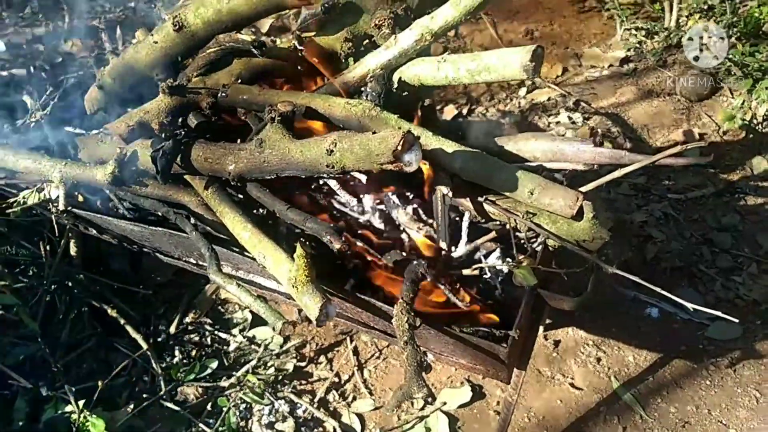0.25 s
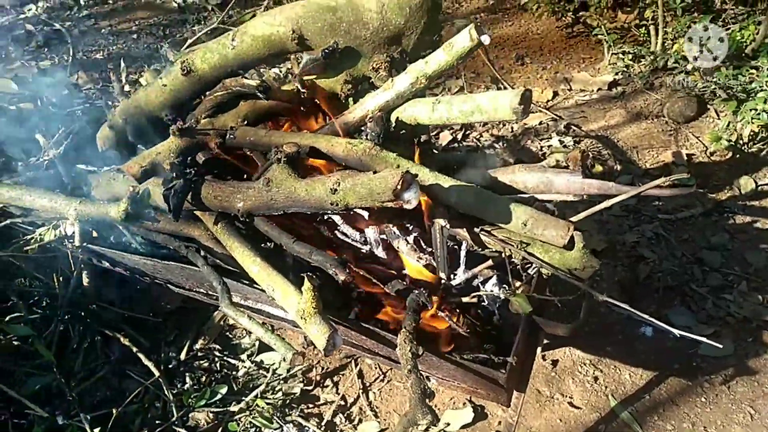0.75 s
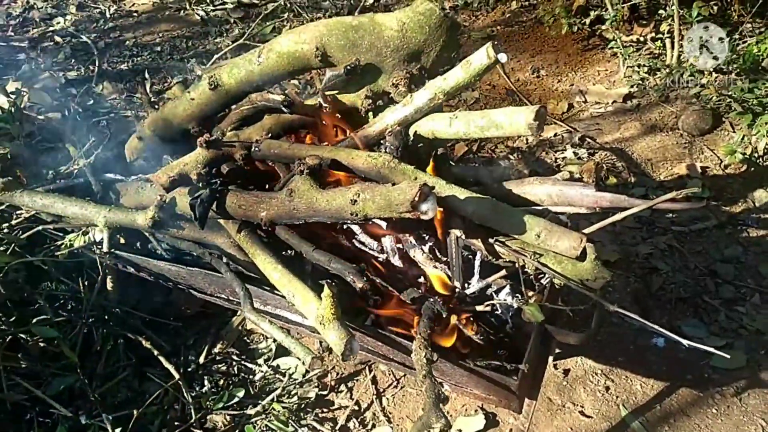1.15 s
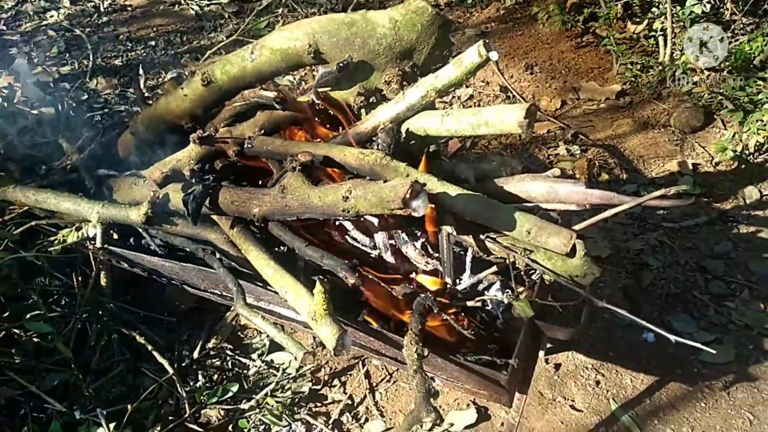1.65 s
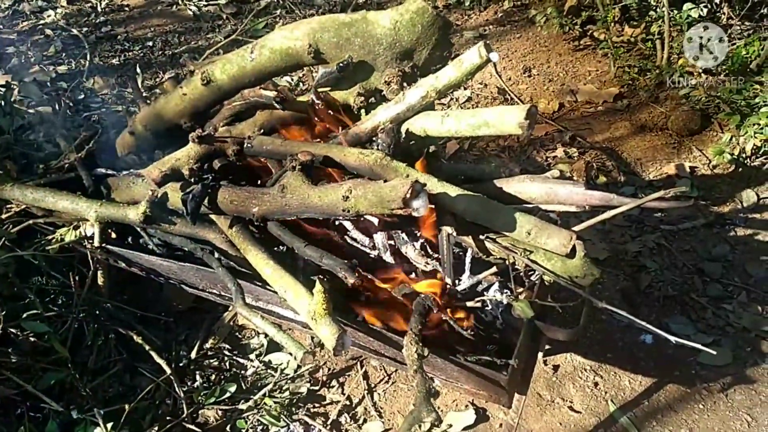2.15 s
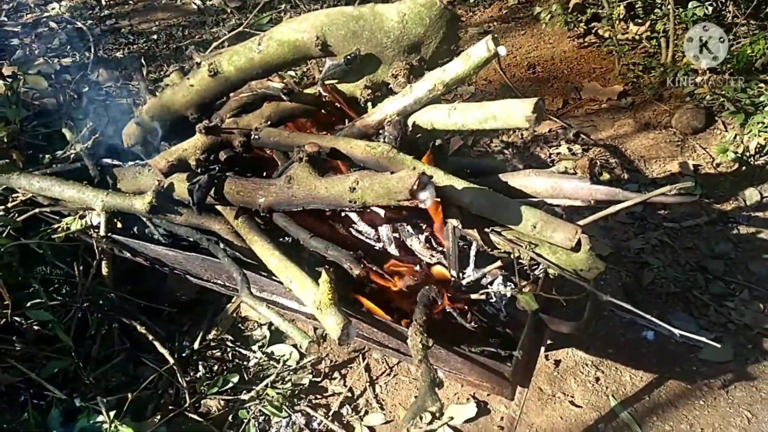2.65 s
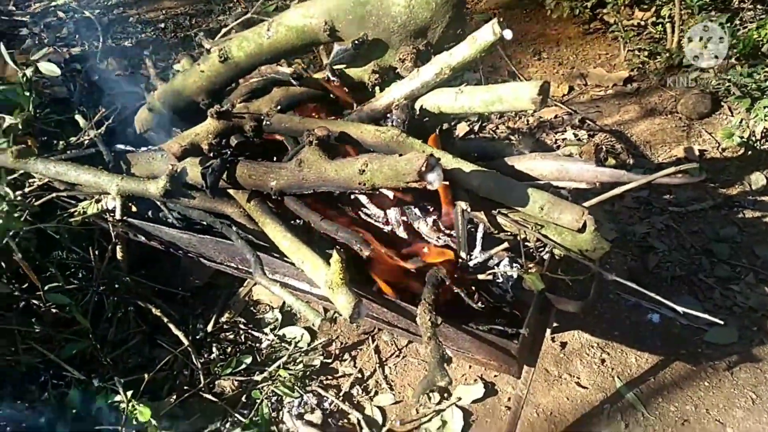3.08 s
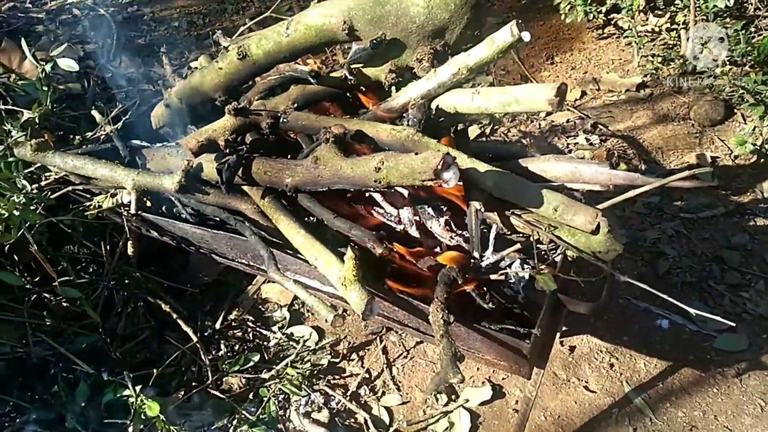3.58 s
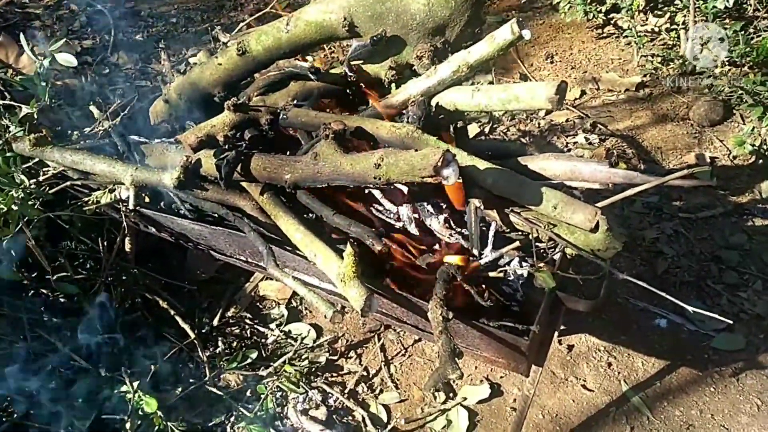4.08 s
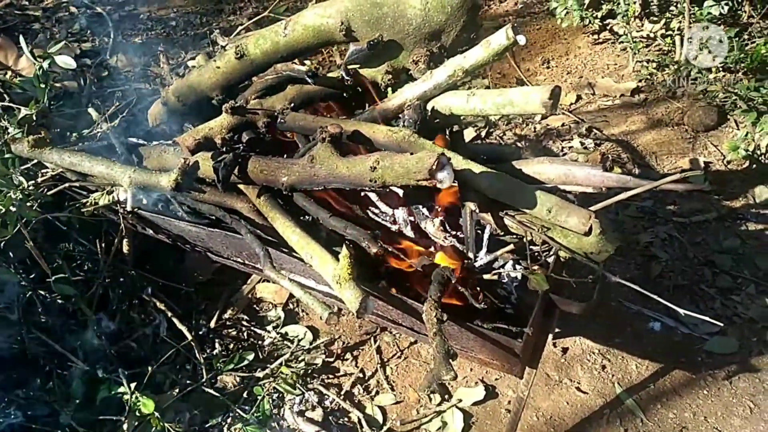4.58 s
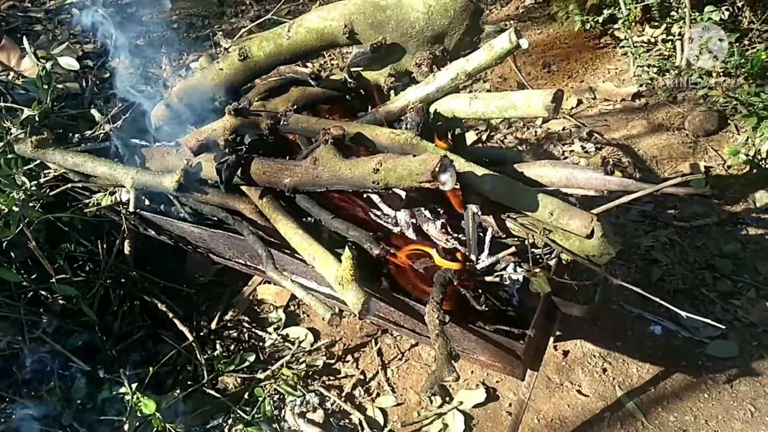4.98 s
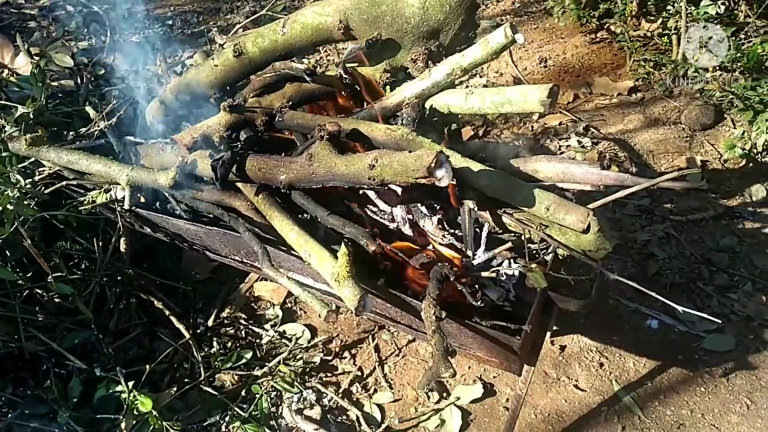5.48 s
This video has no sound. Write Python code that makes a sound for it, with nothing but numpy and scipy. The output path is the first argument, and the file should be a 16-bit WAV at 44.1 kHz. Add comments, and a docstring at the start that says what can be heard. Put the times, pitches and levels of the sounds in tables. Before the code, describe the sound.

Twigs and green branches burn in a metal box outdoors, close to the microphone. Sharp, dry snaps and pops come irregularly, thickest and loudest in the first second, then in looser clusters, each with a very short echo. Around the middle, a light breeze bumps the microphone with soft low rumbles, then eases as the crackling goes on. A faint, high insect buzz and a slight hiss lie underneath.

```python
"""Outdoors among bushes, twigs and green branches burn in a steel box close to a phone.
Pockets of sap snap and pop, and the ground and bushes send back echoes that the phone's noise
suppressor cuts short. Steam sputters out of the wood and once whistles faintly. Insects buzz high in
the shrubs, and gusts of breeze rumble on the microphone over a faint hiss."""
import sys
import numpy as np
from scipy import signal
from scipy.fft import rfft, irfft, next_fast_len
from scipy.io import wavfile
from scipy.ndimage import uniform_filter1d, map_coordinates

SR = 44100
rng = np.random.default_rng(int(sys.argv[2]) if len(sys.argv) > 2 else 0)


def bounce(signal):
    """Save signal as a 16-bit WAV file at the path given by the first command-line argument."""
    frames = np.transpose(np.atleast_2d(signal))
    limited = np.clip(frames, -1, 1)
    pcm = np.round(limited * 32767).astype(np.int16)
    wavfile.write(sys.argv[1], SR, pcm)


N = 252693

# The tone that box, ground and microphone give every pop: (frequency [Hz], gain [dB])
BOX_TONE = [(250, -14), (480, 4), (750, -5), (1100, 5.5), (1700, 1.5), (2300, -6), (2620, -16),
            (3000, -2.5), (3600, 4), (5000, -9.5), (6200, -2), (8400, -9.5), (10500, -0.5), (15300, -3),
            (15700, -23.5), (16400, -26)]
# Bursting sap pockets:
# (time [s], energy [dB], woody knock [dB], snap [dB], brightness [dB], echo relative to pop [dB])
SAP_POPS = [(0.0435, -37, -28, -39, -16, -1), (0.1535, -2.5, -25, -23.5, -4.5, -13),
            (0.192, -22.5, -9.5, -11, -5, 1.5), (0.3035, 2.5, -25, -14, -3, -19),
            (0.349, 1, -23, -11.5, -1, -16), (0.483, -7, -27.5, -27, -6.5, -12.5),
            (0.4995, -15, -24, -24, 2, -9.5), (0.5046, -17, -20.5, -16, -8, -10.5),
            (0.5552, -26.5, -3, -11, 7, -13), (0.5621, -20, -36, -16.5, -8, -4),
            (0.5971, -8.5, -16.5, -11.5, -2.5, -11), (0.6468, -19.5, -13, -11, -1.5, -6),
            (0.6898, -24, -6, -11, -6, -6), (0.7348, -22.5, -24, -6, -8, -6.5),
            (0.7732, -15.5, -17, -9.5, -8, -6.5), (0.7949, -25, -17, -2, -7.5, -13),
            (0.8657, -18, -31, -15, -3.5, -8.5), (0.9247, -5.5, -26, -21, 3.5, -13.5),
            (0.9564, -12.5, -20, -11.5, -1.5, -9), (0.9823, 2, -19, -12, 0, -14.5),
            (1.0067, -12, -23, -8.5, 5.5, -12), (1.0445, -28, -36, -20, 1, 2),
            (1.0662, -15, -30, -20, -2, -11), (1.2318, -21.5, -16, 4.5, 13, -18),
            (1.259, -32.5, 6, -7, 2, -3), (1.3635, -18.5, -11.5, -14.5, -0.5, -5),
            (1.4706, -5.5, -10, -12, -6, -12.5), (1.536, -20.5, -4.5, -1, 0.5, -5.5),
            (1.605, -37, -31, -19, 8, -4), (1.6239, -18.5, -26, -15.5, -7, -6.5),
            (1.6557, -16.5, -23.5, -28, -4.5, -8), (1.8146, -11.5, -8.5, -5, -2.5, -8.5),
            (1.8329, -29, -36, -12, -4, 5.5), (2.0146, -39, -19, -16.5, -1, -4.5),
            (2.109, -9.5, -22.5, -16.5, -6, -7), (2.1183, -24, -14, -21, 1, -6),
            (2.1354, -9, -16.5, -8.5, -2, -11), (2.2131, -8.5, -13, -7, -5, -9),
            (2.304, -29, -5.5, -3.5, -8, -12), (2.4082, -42, 14.5, -31, -5.5, -3),
            (2.4763, -17.5, -19, -16.5, -3.5, -4.5), (2.5009, -27.5, -16, -20, -7, -5),
            (2.567, -18.5, -14, -14.5, -0.5, -4), (2.628, -20.5, 1, -1.5, -10, -5),
            (2.68, -13, -12, -11, 0, -9.5), (2.7063, -24.5, -40, -4.5, -4, -6),
            (3.0856, -23.5, -3, -9, -9.5, -4), (3.1092, -21.5, -31.5, -20, -1.5, -4.5),
            (3.134, -25.5, -9.5, -7.5, -4, -15.5), (3.2906, -9.5, -10.5, -7, -4.5, -7),
            (3.4172, -1.5, -24, -25, -1.5, -13.5), (3.6152, -18, -24, -7, -5, -5.5),
            (3.648, -28, -19, -16, -9, -11), (3.697, -34.5, 7, -7, -20, -6),
            (3.7362, -14, -9.5, -15.5, -7.5, -6.5), (3.7842, -25.5, -3, -14, -9, -5),
            (3.8154, -14, -12.5, -3.5, -5.5, -5.5), (3.8462, -16.5, -8.5, -3, -1.5, -13),
            (4.1913, -11.5, -21.5, -36, -7, -9), (4.259, -25, 11, -7.5, 0.5, -6.5),
            (4.2982, -34, 2, -9, -9, -18), (4.3415, -30, -44, -8, 16, -7),
            (4.45, -15.5, -3, -13, -0.5, -7.5), (4.468, -23, -17, -13, -5, -7),
            (4.6969, -26, -10, -2, -17.5, -1), (4.79, -11.5, -14.5, -21.5, -5, -7),
            (4.857, -12.5, -18, -15.5, -1.5, -5.5), (4.9493, -8.5, -25.5, -19.5, -3, -9.5),
            (5.1983, -43.5, -2, -6, -8.5, -3), (5.382, -17.5, -34, -21, 0, -3),
            (5.4151, -19, -34, -15.5, -8, -5), (5.4458, -9.5, -31, -10.5, 2.5, -10),
            (5.4823, -21, -30, -5, -3, -11), (5.5392, -26.5, -27, -14.5, 6, -8),
            (5.628, -33.5, -48, -24, 8, 0.5)]
def sap_pops():
    """Each pocket cracks, then tears briefly; every twig rings in its own way."""
    out, t = np.zeros(N + SR), np.arange(SR // 40) / SR
    hz = np.fft.rfftfreq(1024, 1 / SR)
    box_db = along(BOX_TONE, hz)
    for time, db, *wood_db, echo_db in SAP_POPS:
        noise, echo_noise = rng.standard_normal(len(t)), rng.standard_normal(SR // 2)
        echo_noise *= 1 + 8 * (rng.random(len(echo_noise)) < 30 / SR)  # stray splinters tick
        ring_db = unit(uniform_filter1d(uniform_filter1d(rng.standard_normal(len(hz)), 9), 7))
        tear_ms = max(3.5 - 0.32 * db, 1)  # weaker pops tear longer
        tear = 0.27 * noise * amp(-60e3 * t / tear_ms)
        tear[0] = 1.1  # the first sharp click
        twig_db = twig_tone(*wood_db, hz)
        crack = np.convolve(tear, impulse_response(box_db + twig_db + 2.3 * ring_db))
        crack *= amp(db) / np.linalg.norm(crack)
        echo_tone = impulse_response(0.73 * box_db + 0.68 * twig_db + 3.4 * ring_db)
        wash = signal.fftconvolve(echo_tone, echoes(echo_noise))
        wash *= amp(db + echo_db) / np.linalg.norm(wash)
        start = round(time * SR)
        out[start:][:len(crack)] += crack
        out[start + 50:][:len(wash)] += wash
    return out[:N]


def twig_tone(knock_db, snap_db, bright_db, hz):
    """A twig's tone in dB: thick wood knocks low, bark snaps, thin dry wood spits high."""
    return along([(520, -44), (1500, knock_db), (3700, snap_db), (6800, -1 - 0.77 * bright_db),
                  (10500, -1.5 + bright_db), (14000, -13 + 0.94 * bright_db)], hz)


# How the echoes fade before they are shut off: (frequency [Hz], time to fall 60 dB [s])
ECHO_FADES = [(900, 0.52), (3000, 0.52), (7000, 1), (11000, 0.64), (15000, 0.53)]
def echoes(noise, gate_close_s=0.08):
    """Ground and bushes echo for about 0.1 s, then the phone's noise suppressor shuts the tail off."""
    hz, t, spectrum = signal.stft(noise, SR, nperseg=128)
    bushes = amp(-60 * t / along(ECHO_FADES, hz)[:, None] - (t / gate_close_s) ** 4)
    ground = 1.7 * amp(-60 * t / 0.09)
    tail = signal.istft(spectrum * (bushes + ground), SR, nperseg=128)[1]
    return tail / np.linalg.norm(tail)


# Spurts of steam: (time [s], level [dB], woody knock [dB], snap [dB], brightness [dB])
STEAM_SPURTS = [(0.039, -69, 19, -1, -2), (1.222, -55, -9, 13, 15), (4.675, -56.5, 10.5, 4.5, -18),
                (4.758, -53.5, 3.5, -4, -24), (5.193, -71, 8, 4.5, -13.5)]
def steam_sizzles(fade_s=0.042):
    """Steam sputters out of green wood, swelling and fading with a tone like the pops."""
    out, t = np.zeros(N), np.arange(N) / SR
    for time, db, *wood_db in STEAM_SPURTS:
        age = np.clip((t - time) / fade_s, 0, None)
        swell = 5 * age / (1 + 5 * age) * np.exp(-age ** 2)
        tone = lambda f: amp(0.8 * along(BOX_TONE, f) + twig_tone(*wood_db, f))
        out += amp(db + 1.9 * wobble(140)) * swell * shaped_noise(tone, patchy_db=3)
    return out


def steam_whistle(pitch_hz=4280, width_hz=150):
    """Steam whistles faintly out of a cut branch end."""
    jet = shaped_noise(lambda f: 1 / (1 + (2 * (f - pitch_hz) / width_hz) ** 2), patchy_db=-1.5)
    return amp(-86 + 4 * wobble(25)) * held(start=4.03, length=0.34, edge=0.03) * jet


# How much buzz the phone's noise suppressor lets through, more after pops: (time [s], level [dB])
BUZZ_LET_THROUGH = [(0.0, -69), (0.17, -64), (0.33, -56), (0.94, -54), (1.16, -59), (1.63, -57),
                    (2.15, -65.5), (2.59, -54.5), (2.79, -65), (2.98, -69), (3.54, -57), (4.02, -62.5),
                    (4.72, -62), (4.91, -55.5), (5.22, -63), (5.41, -60), (5.55, -56.5), (5.73, -55.5)]
# The buzzes, the last a weak one about an octave up: (pitch [Hz], width [Hz], relative level [dB])
INSECT_BUZZES = [(6557, 99, -4.5), (6890, 210, -18), (7045, 340, 3.5), (7510, 280, 0), (8116, 140, -10),
                 (13500, 520, -10.5)]
def insects():
    """Several insects sing, each a narrow, wavering buzz."""
    chorus = np.zeros(N)
    for pitch, width, db in INSECT_BUZZES:
        loudness = amp(db + 3.5 * wobble(18) + 2.2 * wobble(4))
        band = lambda f: 1 / (1 + (2 * (f - pitch) / width) ** 4)
        chorus += loudness * shaped_noise(band, patchy_db=2.5)
    return level_curve(BUZZ_LET_THROUGH) * unit(chorus)


# The breeze between gusts: (time [s], level [dB])
CALM_LEVELS = [(0, -71.5), (.2, -71), (.35, -64.5), (1, -71.5), (2.2, -69.5), (3, -66.5), (4.12, -67),
               (4.38, -74.5), (4.55, -71.5), (5.2, -71), (5.73, -71)]
# Gusts on top of it: (start [s], length [s], level [dB])
WIND_GUSTS = [(2.3, 0.2, -65), (2.531, 0.3, -60.5), (2.857, 0.13, -65), (3.105, 0.12, -59),
              (3.242, 0.15, -59.5), (3.457, .16, -58), (3.737, 0.146, -54), (3.904, 0.147, -59.5),
              (4.45, 0.088, -68.5), (5.26, 0.14, -65)]
# The tone of the deep rumble: (frequency [Hz], gain [dB])
RUMBLE_TONE = [(15, -19), (25, -36.5), (46, -6), (74, 2.5), (130, 5), (202, -4), (282, -27), (400, -31.5),
               (520, -49), (880, -120)]
# The tone of the higher rustle: (frequency [Hz], gain [dB])
RUSTLE_TONE = [(180, -27.5), (270, -2), (450, -3), (620, -11.5), (800, -25)]
def breeze(low_hz=55, high_hz=600):
    """Air rumbles and rustles unevenly on the microphone. The phone cuts the deepest bass."""
    gusts = sum(amp(db) * held(start, length, edge=0.018) for start, length, db in WIND_GUSTS)
    flow = level_curve(CALM_LEVELS) + gusts
    lumps = amp(1.56 * wobble(30))
    rumble = unit(lumps * shaped_noise(lambda f: amp(along(RUMBLE_TONE, f)), patchy_db=-3.5))
    rustle = unit(lumps * shaped_noise(lambda f: amp(along(RUSTLE_TONE, f)), patchy_db=2))
    air = flow * (rumble + amp(-25) * rustle) + puff_strength() * rustle + wind_thumps()
    return filtered(air, lambda f: 1 / np.sqrt((1 + (f / high_hz) ** 4) * (1 + (low_hz / (f + 1)) ** 4)))


# Swirls of air that hit the microphone: (time [s], level [dB], final pitch [Hz])
AIR_SWIRLS = [(2.316, -47.5, 133), (2.599, -57, 142), (2.738, -48, 129), (2.766, -47.5, 118),
              (2.834, -40.5, 132), (2.91, -51.5, 93), (3.186, -45.5, 120.5), (3.265, -44.5, 105),
              (3.465, -39, 118), (3.508, -48.5, 143), (3.545, -43.5, 197), (3.595, -49, 133),
              (3.749, -48, 155), (3.834, -45.5, 167), (3.914, -53, 92), (3.949, -47.5, 174),
              (3.983, -44.5, 130), (4.029, -57.5, 100), (4.883, -56.5, 171), (5.269, -56, 152),
              (5.319, -50.5, 167)]
def wind_thumps(swell_cycles=0.6):
    """Each swirl is a swell of pressure one or two cycles long, its pitch sinking as it passes."""
    out, t = np.zeros(N + SR), np.arange(SR // 8) / SR
    for time, db, hz in AIR_SWIRLS:
        age = t * hz / swell_cycles
        swell = age ** 3.15 * np.exp(1.5 - 1.77 * age)
        cycles = hz * t + 0.63 * (1 - np.exp(-1.5 * age)) + rng.random()
        out[round(time * SR) + 150:][:len(t)] += amp(db) * swell * np.sin(2 * np.pi * cycles)
    return out[:N]


# Puffs that brush the microphone: (time [s], level [dB], fade time [s])
AIR_PUFFS = [(.176, -56.5, 0.064), (0.476, -70.5, 0.021), (2.294, -65, 0.021), (3.264, -66.5, 0.12),
             (3.533, -86, 0.12), (3.734, -81, 0.089), (4.433, -57.5, 0.035), (4.67, -63, 0.037),
             (4.936, -68.5, 0.033), (5.244, -72, 0.045)]
def puff_strength(rise_s=0.005):
    """How hard the puffs of air blow: each rises fast, then fades."""
    out, t = np.zeros(N), np.arange(N) / SR
    for time, db, fade_s in AIR_PUFFS:
        age = np.clip(t - time, 0, None)
        out += amp(db) * (1 - np.exp(-age / rise_s)) * np.exp(-(age / fade_s) ** 2)
    return out


# The tone of the hiss: (frequency [Hz], gain [dB])
HISS_TONE = [(150, -42.5), (250, -11.5), (394, -25), (487, -13.5), (560, -18.5), (5470, -21), (6400, -14),
             (8040, -18), (8630, -20), (13800, -13), (16500, -51.5)]
def hiss():
    """A faint, nearly steady background."""
    return amp(-78.5 + 0.33 * wobble(4.8)) * shaped_noise(lambda f: amp(along(HISS_TONE, f)), patchy_db=0)


def amp(db):
    """Turns decibels into a multiplier."""
    return 10 ** (np.asarray(db) / 20)


def unit(x):
    """Scales x to an average power of 1."""
    return x / np.sqrt(np.mean(x ** 2) + 1e-20)


def along(points, hz):
    """Reads between (frequency, value) points on a log axis."""
    freqs, values = np.transpose(points)
    return np.interp(np.log(hz + 1), np.log(freqs + 1), values)


def level_curve(points):
    """Turns (time, dB) points into one multiplier per sample."""
    return amp(np.interp(np.arange(N) / SR, *np.transpose(points)))


def wobble(rate):
    """A smooth curve through `rate` random values a second."""
    return map_coordinates(rng.standard_normal(int(N * 200 / SR) + 4), [np.arange(N) * rate / SR])


def held(start, length, edge):
    """Rises softly, holds, falls softly; times in seconds."""
    t = np.arange(N) / SR
    inside = np.minimum(t - start, start + length - t)
    return np.sin(np.pi / 2 * np.clip(inside / edge + 0.5, 0, 1)) ** 2


def filtered(x, tone):
    """Scales each frequency in x by tone(frequency)."""
    size = next_fast_len(N + SR // 2)
    return irfft(rfft(x, size) * tone(np.fft.rfftfreq(size, 1 / SR)), size)[..., :N]


def impulse_response(gain_db):
    """A click with this tone and no sound before its start."""
    cepstrum = irfft(gain_db * np.log(10) / 20)
    half = len(cepstrum) // 2
    cepstrum[1:half] *= 2
    cepstrum[half + 1:] = 0
    return irfft(np.exp(rfft(cepstrum)))[:half]


def shaped_noise(tone, patchy_db):
    """Noise with this tone and random louder and softer patches."""
    spectrum = signal.stft(rng.standard_normal(N), nperseg=512)[2]
    patches = uniform_filter1d(rng.standard_normal(spectrum.shape), size=3, axis=0)
    patches = unit(uniform_filter1d(patches, size=6, axis=1))
    noise = signal.istft(spectrum * amp(patchy_db * patches), nperseg=512)[1][:N]
    return unit(filtered(noise, tone))


def scene():
    """The fire and its surroundings in one channel."""
    return (sap_pops() + steam_sizzles() + insects() + breeze() + hiss() + steam_whistle())[None]


def record(dry, top_hz=16672):
    """The phone cuts off the very highest treble."""
    return filtered(dry, lambda hz: hz < top_hz)


dry = scene()
out = record(dry)
bounce(out)
```